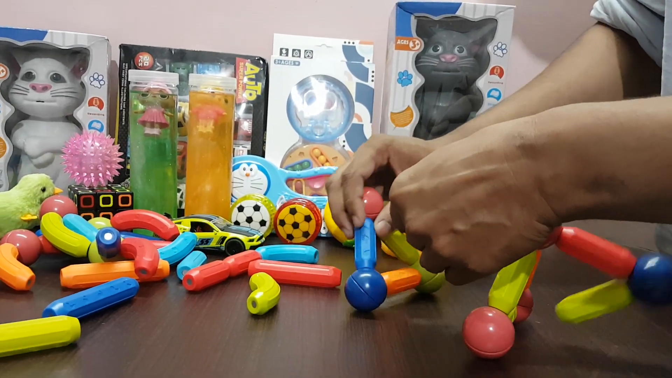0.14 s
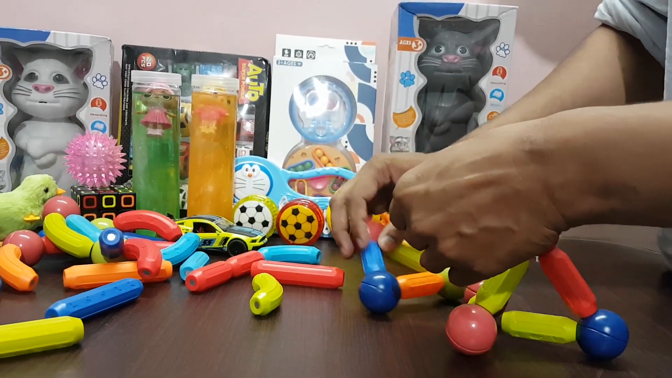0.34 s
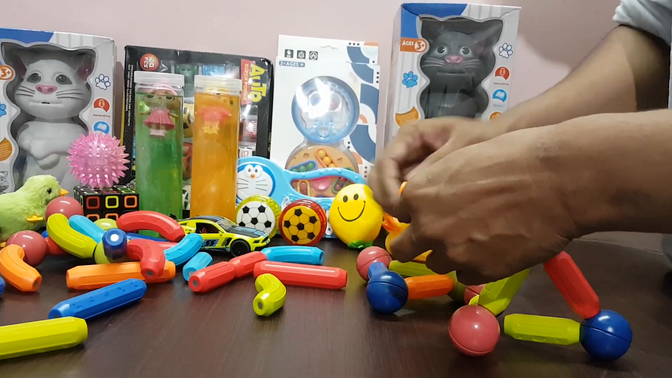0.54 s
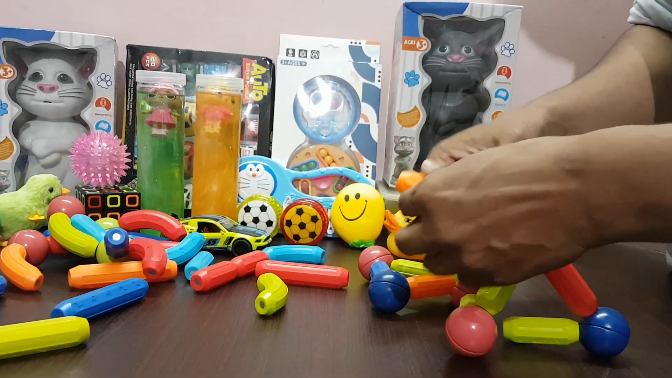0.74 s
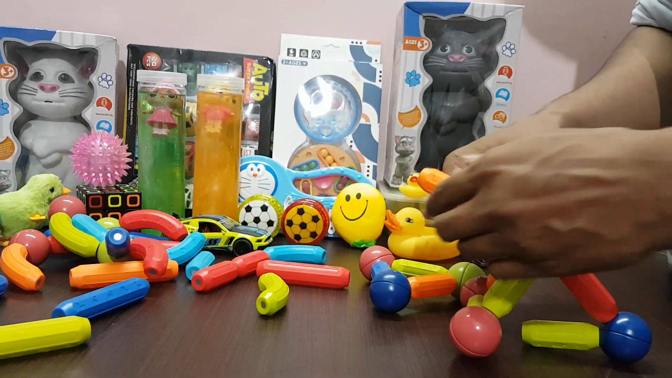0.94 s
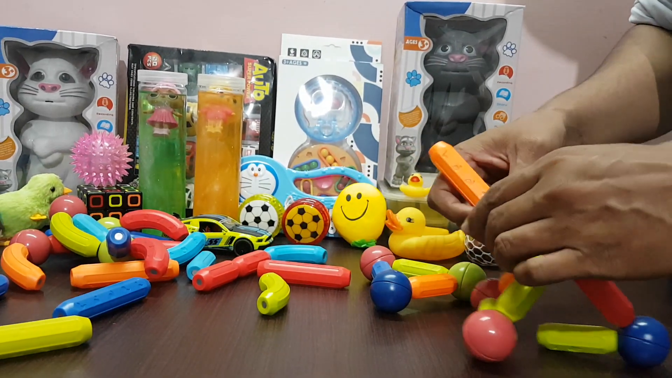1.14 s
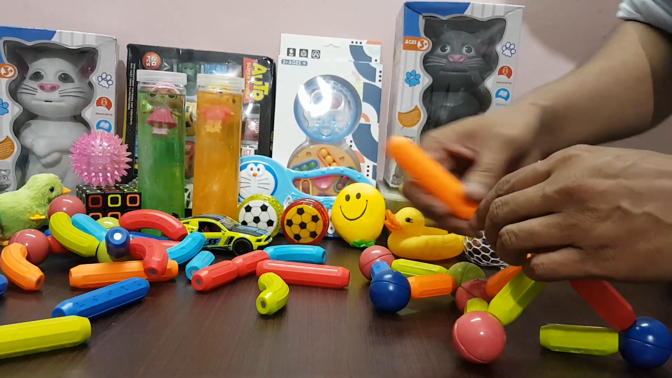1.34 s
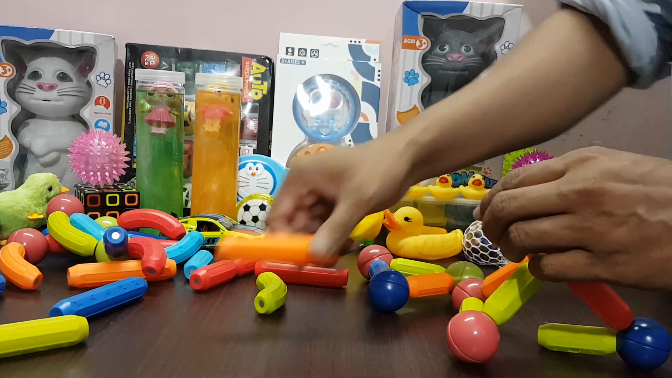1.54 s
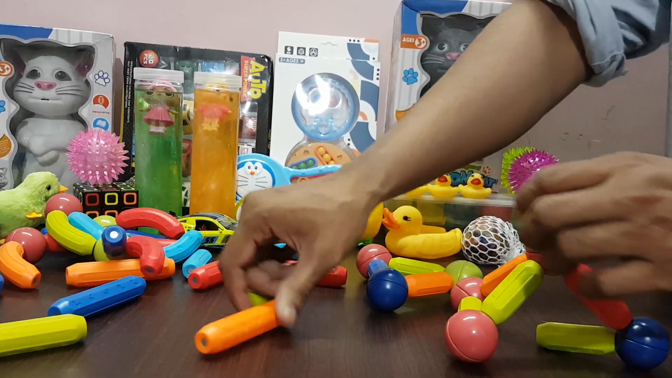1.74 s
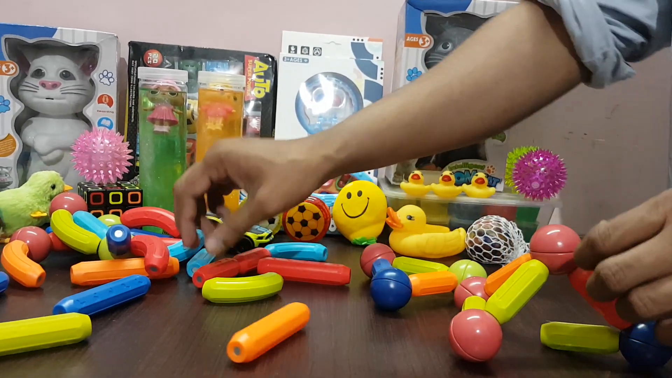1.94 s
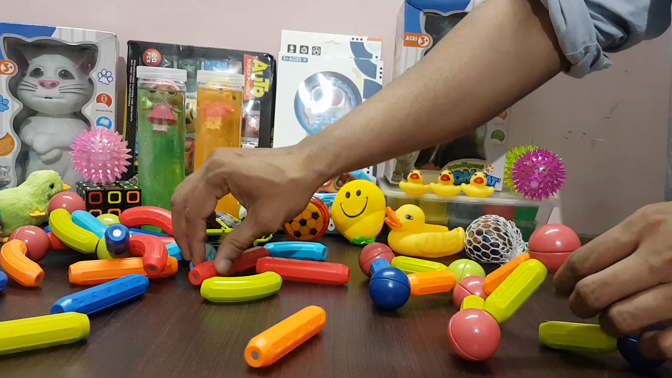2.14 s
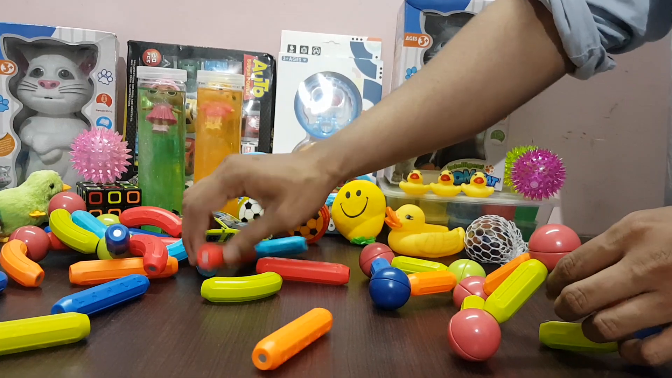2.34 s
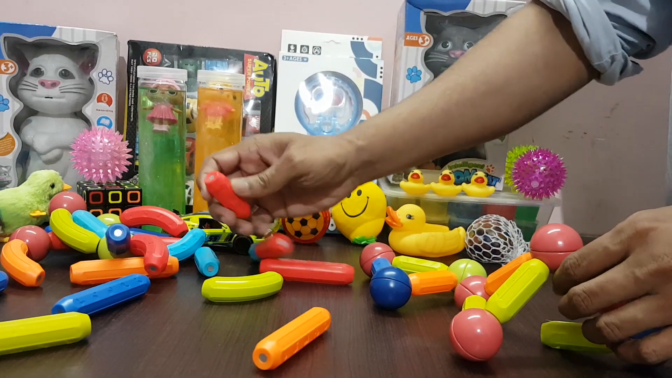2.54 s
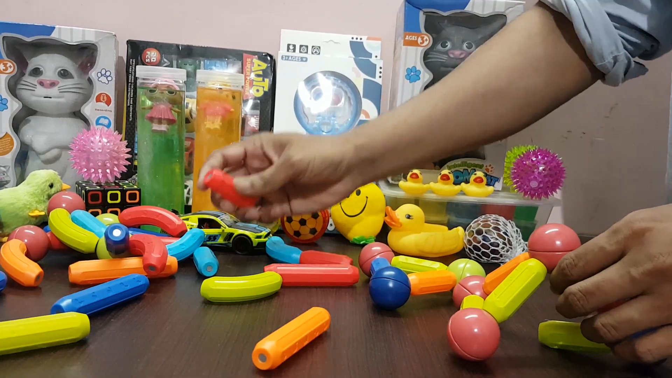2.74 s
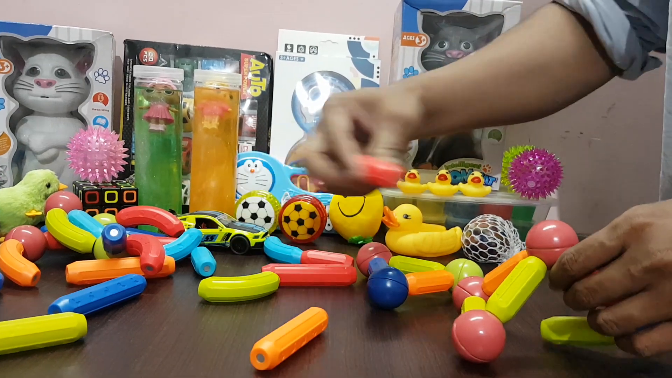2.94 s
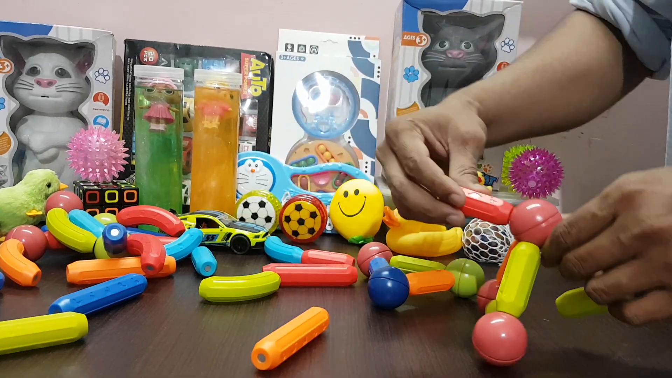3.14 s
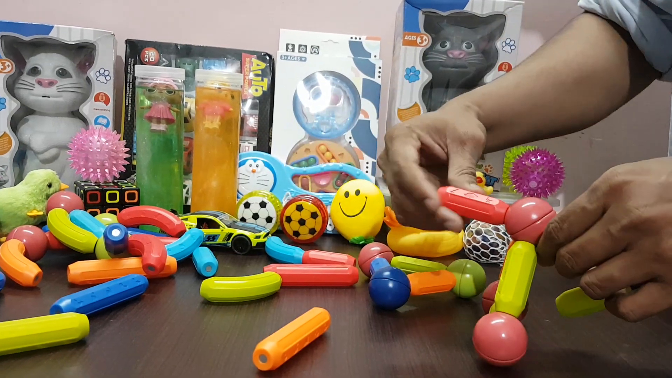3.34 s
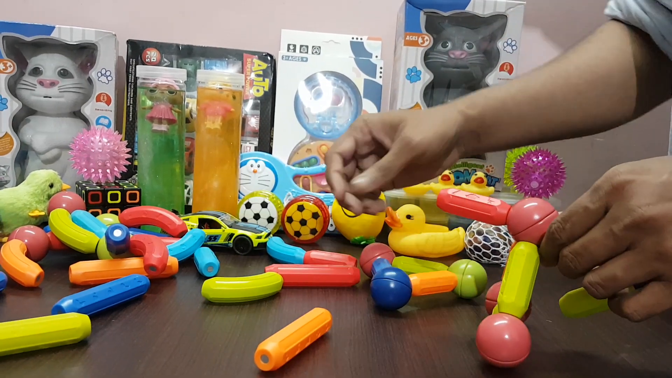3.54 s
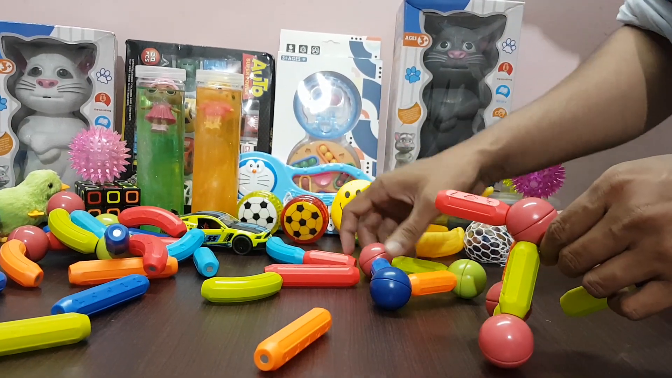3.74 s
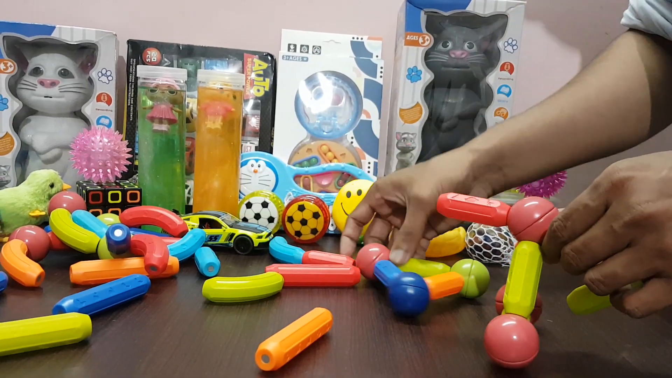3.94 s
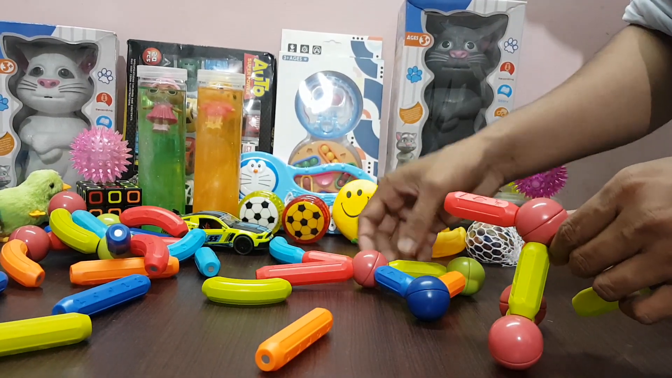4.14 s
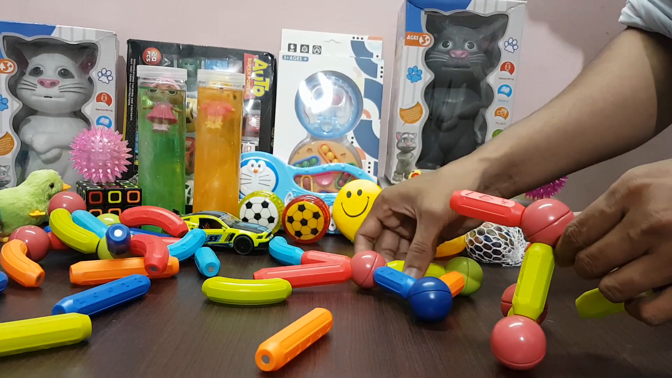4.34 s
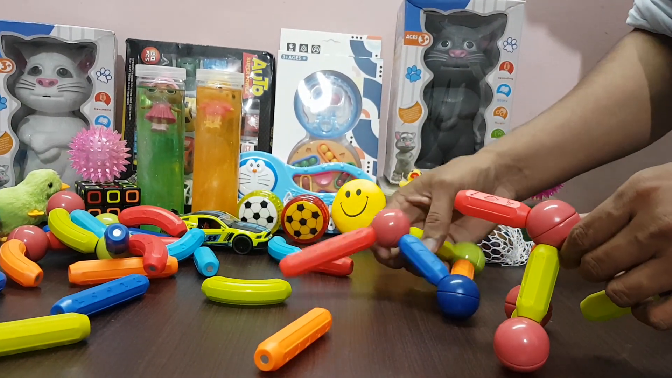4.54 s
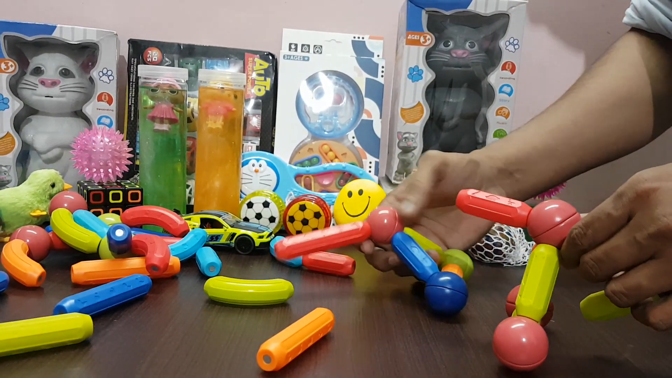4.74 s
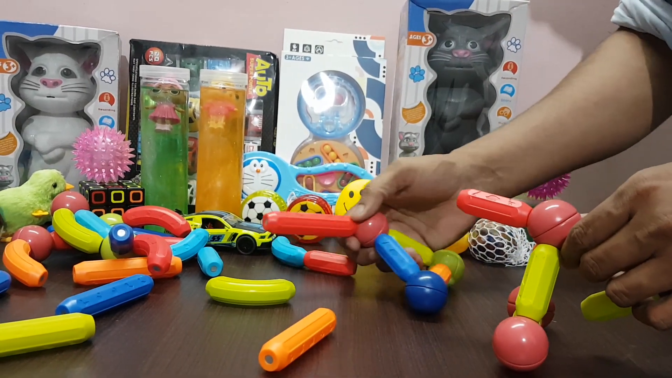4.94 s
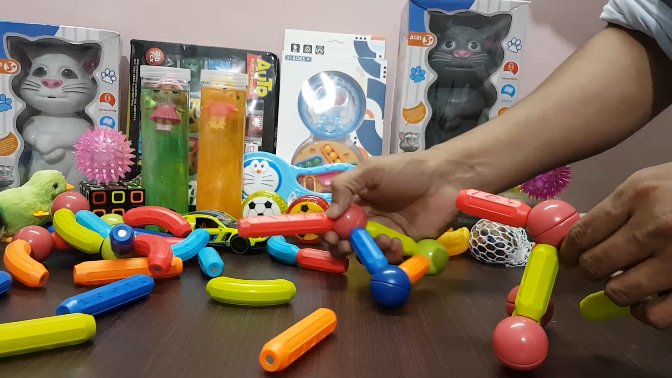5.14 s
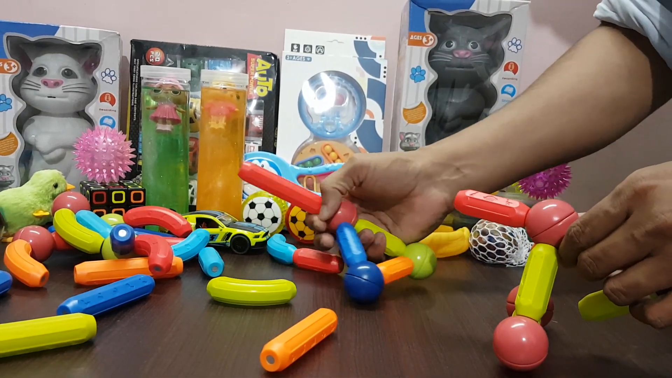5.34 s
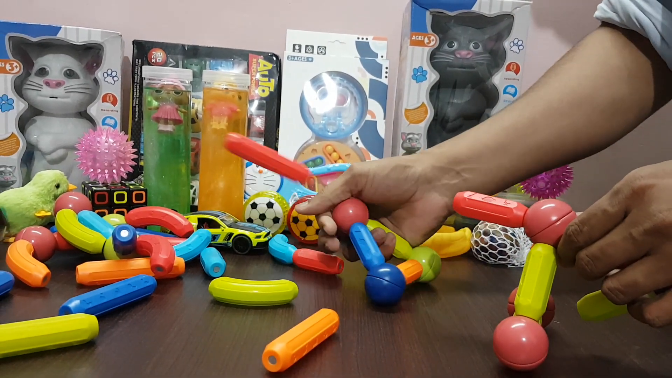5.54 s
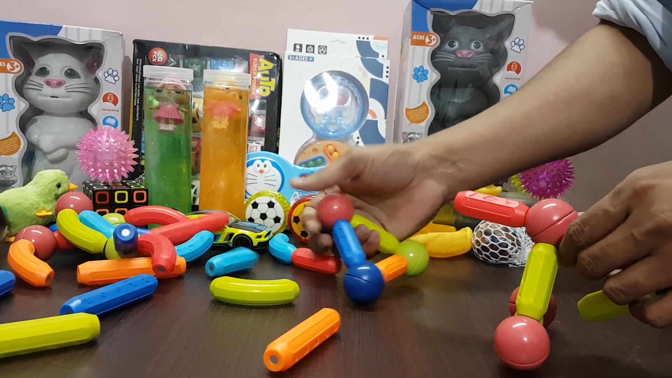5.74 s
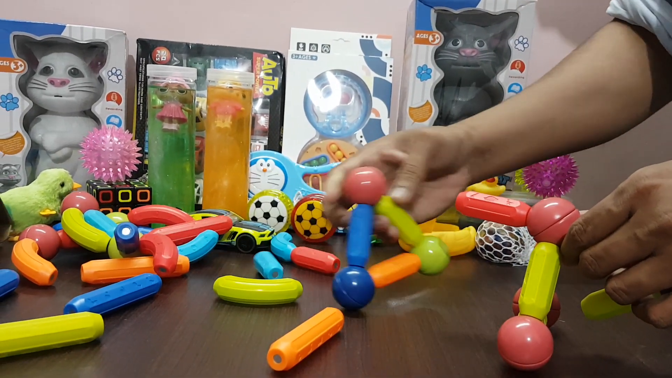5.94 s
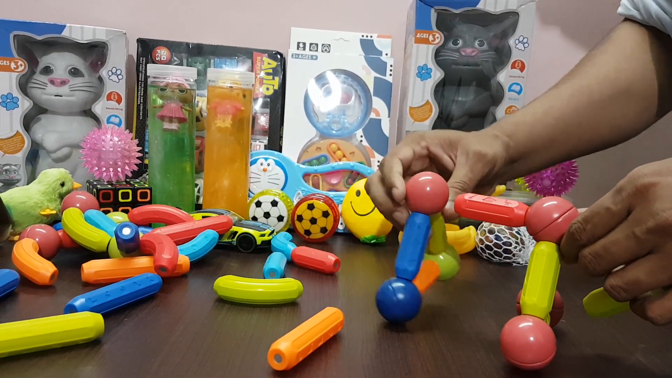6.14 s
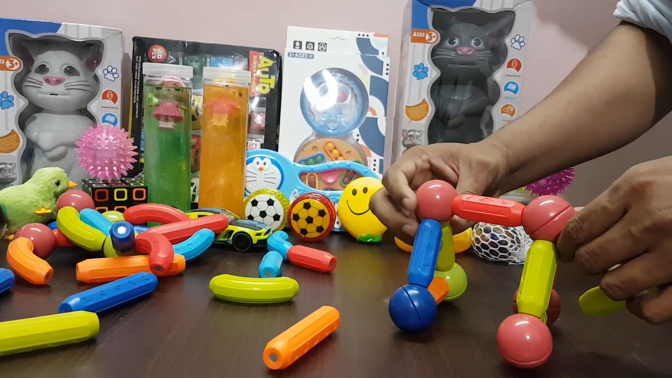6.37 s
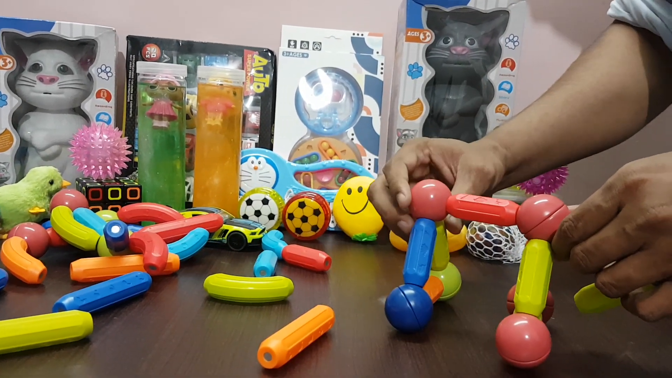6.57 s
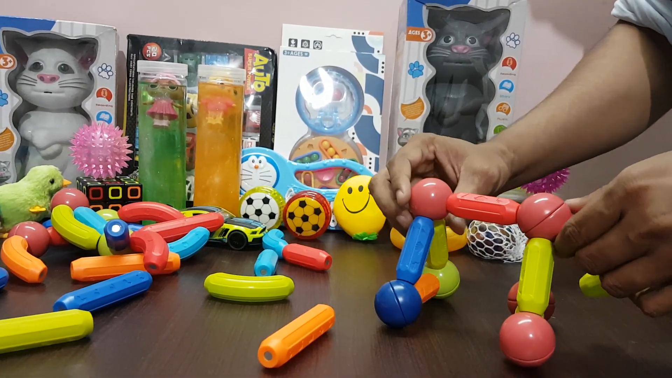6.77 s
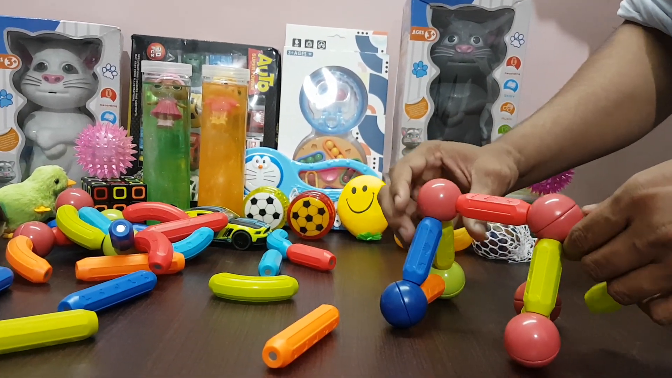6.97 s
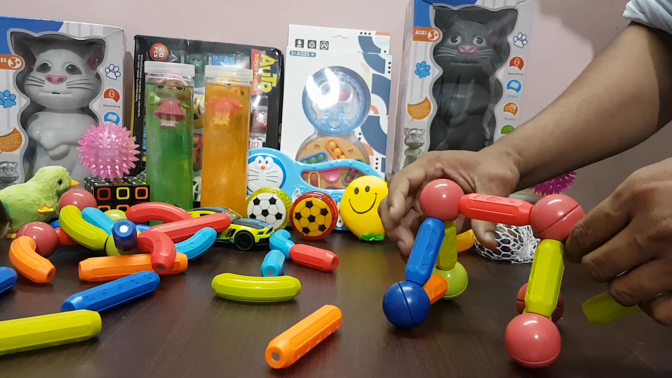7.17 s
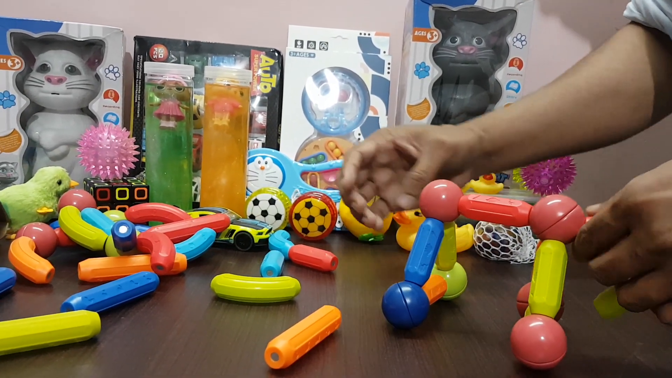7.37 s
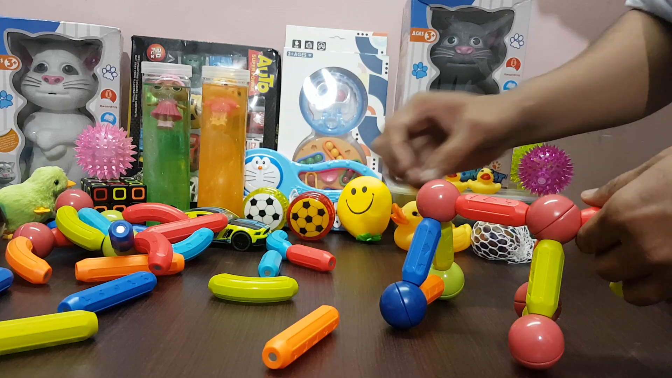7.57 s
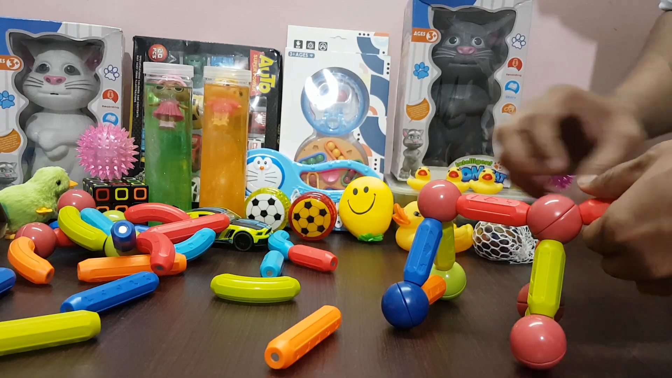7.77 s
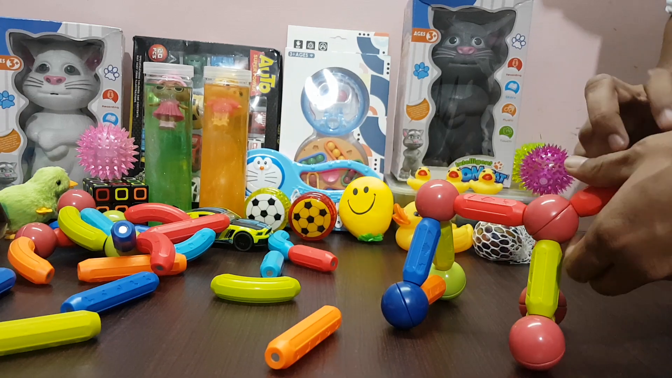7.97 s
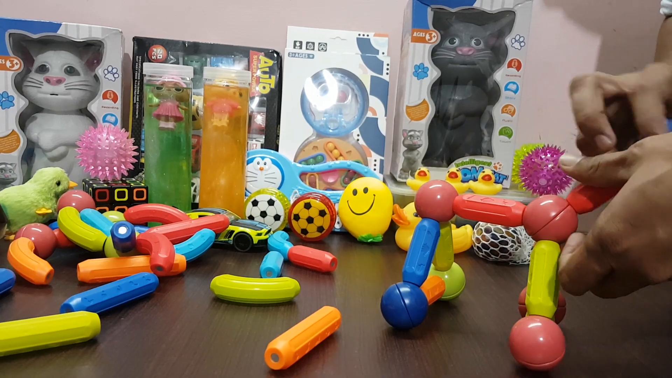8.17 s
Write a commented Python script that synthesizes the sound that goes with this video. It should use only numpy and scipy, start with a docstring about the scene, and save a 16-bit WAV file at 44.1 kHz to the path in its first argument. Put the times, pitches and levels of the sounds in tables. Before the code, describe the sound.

Magnetic toy pieces snap, slide and clack on a tabletop indoors, with loose magnets jingling and a few microphone pops.

```python
"""A short scrape and a sharp clack open the scene: hollow plastic sticks and balls snap together by their
magnets and knock on a wooden table in a small hard room. Each impact excites the modes of body, wall and
table top. Between blows, hands slide and rattle the pieces and loose magnets jingle; late on, a dropped
stick bounces. Three sharp pops jolt the left microphone alone. Mains hum and soft hiss fill the pauses;
midway the hum and some of the bass fade for a while."""
import sys
import numpy as np
from scipy import signal
from scipy.fft import rfft, irfft
from scipy.io import wavfile
from scipy.ndimage import uniform_filter1d

SR = 44100
rng = np.random.default_rng(int(sys.argv[2]) if len(sys.argv) > 2 else 0)


def dump_mix(stems):
    """Bounce the given channels to the path in sys.argv[1] as a 16-bit WAV at rate SR."""
    frames = np.atleast_2d(stems).T  # one column per channel
    limited = np.clip(frames, -1, 1)  # hard clip at full scale
    pcm = np.round(limited * 32767).astype(np.int16)
    wavfile.write(sys.argv[1], SR, pcm)


N = 362052

# Impacts: (time [s], body level [dB], table thump [dB re body], wall ring [dB re body],
# tick [dB re body], body mode [Hz], wall mode [Hz], tick mode [Hz])
IMPACTS = [(0.16, -3, -10.5, -6.5, -10, 690, 3240, 5700), (0.31, -20, -21, 0, 0, 1050, 2500, 6240),
           (0.349, -13, -8, -4.5, 1, 1530, 3380, 7500), (0.474, 0.5, -13.5, -14, -21, 920, 2200, 12400),
           (0.498, -7.5, -21, -16, -24, 846, 2070, 7460), (0.525, -12.5, -12, -14, -22, 1250, 2520, 7040),
           (0.722, -41, -4, -3, -8.5, 845, 2180, 7000), (1.06, -44, -8.5, -6, -5.5, 466, 3130, 7000),
           (1.523, -53.5, -6.5, 5.5, -5.5, 768, 3530, 7520), (1.736, -12, -21, -1.5, 0.5, 1960, 2515, 7930),
           (1.786, -22.5, -18.5, 1.5, 8.5, 600, 2320, 7830),
           (1.806, -16.5, -33, -0.5, -21, 1180, 2320, 7300), (1.832, -22, -19, -0.5, 7, 1740, 3240, 7700),
           (2.106, -24.5, -34, 1.5, -3, 1130, 2480, 7550), (2.174, -36.5, -10, -12, -23, 581, 2470, 6950),
           (2.21, -34.5, -13, 4.5, 2.5, 509, 2480, 6130), (2.239, -17, -22, -32, -21, 1510, 2240, 7150),
           (2.261, -21, -27, -34, -19, 820, 2230, 6620), (2.5, -35, -12, -14, -8, 925, 2430, 11100),
           (2.551, -32.5, -23, 4.5, -1, 1020, 2050, 6000),
           (2.601, -10.5, -19.5, -1.5, -2, 1220, 2950, 7200), (2.625, -21.5, -30, -6, 1, 859, 2720, 7230),
           (2.696, -26.5, -11.5, 0.5, -13, 842, 3130, 7050), (2.76, -8.5, -27, -7, -17, 1860, 3030, 5900),
           (2.786, -21, -16, -3, -3, 1930, 2000, 10800), (2.796, -21.5, -16, 4.5, -4, 1880, 2720, 6600),
           (3.221, -22.5, -25.5, 5, 8.5, 1830, 2620, 13900), (3.463, -55, -10, 7.5, -16.5, 825, 3340, 5700),
           (3.825, -38, -11, -1, -19, 846, 2333, 6880), (4.027, -22.5, -24, -1.5, -14, 880, 3040, 7150),
           (4.065, -12, -15, -7, -27, 850, 2720, 7320), (4.084, -13.5, -27, -6, -3.5, 1180, 2050, 7300),
           (4.116, -19.5, -14.5, 3, 4, 780, 2870, 7330), (4.251, -39, -17, -2.5, -7, 458, 3700, 6400),
           (4.364, -41.5, -21, 2, 2, 1160, 2540, 7250), (4.395, -36, -32, -10, -14, 705, 2530, 7740),
           (4.424, -40, -21, 7, -4, 452, 2530, 7600), (4.498, -37.5, -32, 11, 5, 856, 2800, 6500),
           (4.542, -37.5, -33, -30, -22, 800, 3210, 6110),
           (4.676, -17.5, -17.5, -20, -16.5, 452, 2600, 5330), (4.665, -49, -20, 8, -1, 800, 2550, 5800),
           (4.801, -36.5, -32, 3, -6, 1890, 2050, 5950), (4.818, -40.5, -10, 3.5, -28, 1400, 2660, 6230),
           (4.883, -39, -11, -8, 2, 455, 3800, 5800), (4.894, -30.5, -15.5, 3.5, -3.5, 860, 2000, 5850),
           (5.001, -48.5, -8, 7, 8, 452, 2560, 8120), (5.017, -50, -21, 5, 19.5, 845, 2620, 7300),
           (5.035, -46, -8, 7.5, 11.5, 654, 2180, 7140), (5.061, -29, -23, 2.5, -4, 507, 2100, 11100),
           (5.256, -40.5, -29, 3, -4, 912, 3200, 6940), (5.294, -35, -28, -3.5, -13, 1210, 2600, 7360),
           (5.458, -49.5, -16, 15, 10, 883, 3150, 7240), (5.544, -49, -17, 7, 8, 1370, 3220, 7200),
           (5.597, -14, -10, -12.5, -29, 800, 2080, 7600), (5.761, -9, -23, 0, -4.5, 1560, 2330, 12600),
           (5.78, -20.5, -4.5, 7.5, 9.5, 1180, 3090, 7300), (5.792, -20.5, -9, 6, 4, 800, 3170, 7300),
           (6.388, -24.5, -2, -24, -13, 860, 2220, 6700), (6.412, -24, -28, -2.5, -7, 603, 3350, 14100),
           (6.423, -31, -4, 4, 1, 834, 2510, 7440)]
# Timbre of the dropped stick: the last six columns of IMPACTS
STICK_TIMBRE = (-18.5, -6.5, -22.5, 1180, 2595, 5000)
# Modes of the hollow bodies: (frequency [Hz], bandwidth [Hz], gain [dB])
BODY_MODES = [(620, 93, -4.5), (922, 99, 6), (1180, 53, -1.5), (1603, 97, 4), (1790, 73, -8),
              (2345, 83, -5.5)]
# Modes of the thin walls: (frequency [Hz], bandwidth [Hz], gain [dB])
WALL_MODES = [(2600, 540, 0.5), (3210, 220, 9), (5000, 400, -10.5), (6300, 870, -1), (7600, 810, 2.5),
              (10900, 400, -11), (13900, 9100, 1.5)]
# Modes of the table top: (frequency [Hz], gain [dB], nominal decay time [s])
TABLE_MODES = [(102.3, -6, 0.29), (193, -6.5, 0.19), (261.4, -2, 0.15), (327.4, -4, 0.062),
               (446, -0.5, 0.097)]
# Spells of jingling: (start [s], end [s], first level [dB], last level [dB], nominal tick rate [1/s],
# lowest mode [Hz], extra gain of the second mode [dB])
JINGLE_SPELLS = [(1.762, 1.856, -50, -33, 98, 3430, -9), (1.839, 2.034, -43.5, -67.5, 92, 3480, 13),
                 (2.295, 2.372, -54, -64.5, 75, 3600, -5.5), (2.437, 2.521, -66, -68.5, 98, 3500, 1.5),
                 (2.619, 2.76, -54, -41, 61, 3210, -1.5), (4.028, 4.198, -44.5, -52, 70, 3300, -1),
                 (4.366, 4.46, -63, -63, 76, 2530, -5), (4.502, 4.581, -55, -67, 70, 3200, 5),
                 (4.973, 5.037, -62, -68, 82, 2530, -5), (5.256, 5.595, -58, -60, 62, 3306, -3.5),
                 (5.931, 6.1, -62, -65, 73, 2600, 8), (1.16, 1.238, -68, -73, 70, 3580, -1.5),
                 (5.769, 5.901, -27, -48, 74, 3256, -4.5)]
# Modes of a loose magnet in its socket: (frequency ratio [1], bandwidth per stage [Hz], gain [dB])
MAGNET_MODES = [(1, 229.5, 3.5), (1.81, 280, -9.5), (2.21, 480, -3.5), (3.42, 804, -17)]
# Activity of the hands among the pieces: (time [s], level [dB])
HAND_ACTIVITY = [(0, -60.5), (.7, -59), (1.35, -66), (1.6, -77), (2.0, -61), (2.9, -74), (3.0, -61),
                 (3.5, -74.5), (3.8, -79.5), (4.0, -60), (4.9, -61), (5.3, -55.5), (5.6, -62),
                 (5.72, -64.5), (6.1, -57.5), (6.5, -69), (7.2, -77), (7.6, -87)]
# Pieces slid over the table: (start [s], fade time [s], rumble [dB], knocking [dB], rubbing [dB],
# hollow note [Hz])
SLIDE_STROKES = [(0.0, 0.21, -44, -54, -78, 750), (0.88, 0.085, -46.5, -54.5, -91, 1200),
                 (1.15, 0.12, -43, -46.5, -68.5, 1203), (1.849, 0.11, -50, -43, -52, 910),
                 (2.062, 0.061, -49, -37, -51.5, 1190), (2.257, 0.19, -46, -43, -56.5, 810),
                 (2.437, 0.13, -48, -50.5, -59, 900), (2.637, 0.17, -62, -43, -52, 1200),
                 (3.857, 0.057, -46.5, -42.5, -64, 620), (4.367, 0.077, -76, -59, -80, 1160),
                 (4.51, 0.061, -79, -51, -75, 1200), (4.565, 0.05, -78, -57.5, -75, 855),
                 (5.072, 0.13, -56, -48, -66, 533), (5.372, 0.14, -56, -50, -70, 820),
                 (5.772, 0.18, -45, -29.5, -51, 1190), (6.159, 0.16, -51.5, -51, -67.5, 1150),
                 (6.72, 0.12, -72, -65.5, -85, 1700)]
# Jolts of the left microphone: (time [s], peak level [dB])
MICROPHONE_POPS = [(2.41, -6), (2.434, -2), (2.542, -5)]
# Reverberation of the room: (frequency [Hz], time to fall 60 dB [s])
ROOM_DECAY = [(100, 0.38), (400, 0.39), (1200, 0.26), (4000, 0.24), (9000, 0.24), (15000, 0.17)]
# Likeness of the sound at the two microphones: (frequency [Hz], correlation [1])
STEREO_CORRELATION = [(60, 0.16), (240, 1), (950, 0.43), (3770, -0.54), (15000, -0.18)]
# Harmonics of the mains hum: (frequency [Hz], level [dB])
HUM_HARMONICS = [(101, -59), (202, -70)]
# Passing fade of the hum, which the bass follows in part: (time [s], gain [dB])
HUM_FADE = [(0, 0), (2.88, 0), (2.97, -10), (3.9, -13), (4.55, -12), (4.68, -1), (8.21, -1)]
# Spectrum of the hiss: (frequency [Hz], relative density [dB])
HISS_SPECTRUM = [(20, -42.5), (50, -19), (90, -15.5), (150, -19.5), (260, -20), (420, -25), (1300, -28.5),
                 (3000, -35), (5500, -41.5), (7600, -40.5), (9800, -51.5), (13000, -44.5), (16000, -43)]

CONTACT_S, IMPACT_DELAY_S = .0024, .001  # decay of the chatter; lag behind the onset of the rattle
SHARP_DB_PER_DB, SHARP_FROM_DB = 0.3, -15.5  # harder ticks carry more broad treble
BOUNCE_START_S, FLIGHT_S, RESTITUTION, ROCK_S = 5.829, .05, .8, .0205
BOUNCE_DB, SOFTENING = -15, 1.3  # first landing; amplitude follows this power of the flight time
HANDS_MIX_DB = (0.5, 1.5, -17.5)  # rumble, knocking, rubbing
RATTLE_DB, RATTLE_T60_S = (-21.5, -29.5, -34.5), (0.33, 0.22, 0.12)  # the same three, after an impact
SLIDE_RISE_S, SLIDE_FADE_DB = 0.016, -15  # the fade is reached after one fade time
NOTE_DB, NOTE_WIDTH_HZ = -1.5, 110  # a slide's hollow note, relative to its knocking
RECOIL_HZ, IMPACT_ECHO_DB, HISS_DB = 88, -4, -62.5
THIN_HZ, THIN_SHARE = 180, 0.66  # below this the pieces follow a share of the hum's fade in dB
LEFT_RE_RIGHT_DB, BAND_LIMIT_HZ = -2, 16100


def impact(db, table_db, wall_db, tick_db, body_hz, wall_hz, tick_hz):
    """Modal excitation: a brief contact force rings the piece, its wall and the table under it."""
    t = np.arange(-8, 8184).clip(0) / SR
    force = contact_force(t)
    push = np.exp(-t / 0.0029) * [[1], [1]]
    table_ring = resonances(push, [(hz, 2.6 / decay_s, level) for hz, level, decay_s in TABLE_MODES])
    table = band(table_ring + 0.18 * force + 0.024 * push, 45, 550)
    hollow = resonance(force, body_hz, width_hz=500)
    body = band(resonances(force, BODY_MODES) + hollow + 0.69 * force, 350, 2400)
    wall = band(resonance(force, wall_hz, width_hz=450) + 0.12 * force, 1600, 5900)
    sharpness = gain_of(SHARP_DB_PER_DB * (db + tick_db - SHARP_FROM_DB))
    treble = 0.16 * resonances(force, WALL_MODES) + .15 * force
    tick = band(resonance(force, tick_hz, width_hz=500) + sharpness * treble, 5600, 24000)
    knock = peaked(body) + gain_of(table_db) * peaked(table) + gain_of(wall_db) * peaked(wall)
    return gain_of(db) * (knock + gain_of(tick_db) * peaked(tick))


def contact_force(t):
    """Broadband excitation: a brief chatter of contacts has a nearly flat spectrum."""
    fall = np.exp(-t / CONTACT_S) * np.minimum(t / 0.00031, 1)
    spectrum = rfft(shared_noise(len(t), spread=.6) * fall)
    force = irfft(spectrum / (abs(spectrum) + 1e-9), len(t)) * fall ** 0.11
    force[1] = np.roll(force[1], rng.integers(-6, 7))  # the sound reaches one microphone first
    return force / np.linalg.norm(force[0]) * np.linalg.norm(fall)


def stick_bounces(count):
    """Inelastic rebound: flights shorten and landings soften until the stick rocks. Gives impact rows."""
    flights = np.maximum(FLIGHT_S * RESTITUTION ** np.arange(count), ROCK_S)
    times = BOUNCE_START_S + np.cumsum(flights) - flights
    levels = BOUNCE_DB + SOFTENING * 20 * np.log10(flights / FLIGHT_S)
    return [(start, db, *STICK_TIMBRE) for start, db in zip(times, levels)]


def magnet_jingle(start, end, first_db, last_db, ticks_per_s, lowest_hz, second_db):
    """Repeated impact: a loose magnet chatters by fits and starts, each tick ringing the same modes."""
    n = round((end - start) * SR)
    drift, grit, fits = rng.standard_normal((3, n))
    cycles = np.cumsum(ticks_per_s * (1 + 8.8 * uniform_filter1d(drift, 400))) / SR
    since_tick = (cycles % 1) / ticks_per_s
    force = (np.exp(-since_tick / .003) + .15) * (grit + .6 * rng.standard_normal((2, n)))
    force *= gain_of(4 * wander(fits, 900))
    sound = 0
    for k, (ratio, width, db) in enumerate(MAGNET_MODES):
        hz = ratio * lowest_hz
        mode = resonance(resonance(force, hz, width), hz, width)
        sound += gain_of(db + second_db * (k == 1)) * mode
    return gain_of(np.linspace(first_db, last_db, n)) * unit_rms(sound) * signal.windows.tukey(n, .1)


def handling_rattle(impacts):
    """Shot noise: dense tiny contacts of uneven size ring the pieces while the table rumbles along."""
    rumble, knocking, rubbing = handling_envelopes(impacts)
    size = gain_of(2.2 * np.minimum(rng.exponential(1, N), 4))
    touching = rng.random(N) < 2500 / SR  # contacts per second
    contacts = size * touching * shared_noise(N, spread=1.3)
    table = band(diffuse_noise(N), 120, 480)
    bodies = band(resonances(contacts, BODY_MODES) + .5 * contacts, 450, 3000)
    walls = band(resonances(contacts, WALL_MODES) + 0.072 * contacts, 2400, 16000)
    return rumble * unit_rms(table) + knocking * unit_rms(bodies) + rubbing * unit_rms(walls)


def handling_envelopes(impacts):
    """Drive and damping: hands and slides stir the pieces; after an impact they settle exponentially."""
    t = np.arange(N) / SR
    gain = gain_of(curve(HAND_ACTIVITY) + np.array(HANDS_MIX_DB)[:, None])
    for start, fade_s, *levels, _ in SLIDE_STROKES:
        add(gain, start, gain_of(levels)[:, None] * slide_envelope(fade_s))
    settling = gain_of(np.array(RATTLE_DB)[:, None] - 60 * t[:SR // 2] / np.array(RATTLE_T60_S)[:, None])
    for start, db, table_db, wall_db, *_ in impacts:
        add(gain, start, gain_of(db + np.array([[table_db], [0], [wall_db]])) * settling)
    return gain


def slide_notes():
    """Frictional excitation: rubbing noise drives the hollow resonance of each sliding piece."""
    out = np.zeros((2, N))
    for start, fade_s, _, knock_db, _, hz in SLIDE_STROKES:
        envelope = slide_envelope(fade_s)
        friction = shared_noise(len(envelope), spread=.6)
        note = unit_rms(resonance(friction, hz, NOTE_WIDTH_HZ))
        add(out, start, gain_of(knock_db + NOTE_DB) * envelope * note)
    return out


def slide_envelope(fade_s):
    """Attack and decay: a slide rises linearly, then fades along a Gaussian curve."""
    t = np.arange(0, 2 * fade_s, 1 / SR)
    return gain_of(SLIDE_FADE_DB * (t / fade_s) ** 2) * np.minimum(t / SLIDE_RISE_S, 1)


def microphone_pop(db):
    """Step response: the left microphone's bass cut swings a sudden jolt back through zero."""
    step = np.clip((np.arange(2000) - 60) / 6.5, 0, 1)
    swing = signal.lfilter(*signal.butter(2, RECOIL_HZ, "high", fs=SR), step)
    swing = signal.lfilter(*signal.butter(1, 22, "high", fs=SR), swing)
    return gain_of(db) * peaked(swing) * [[1], [0]]


def room(x):
    """Reverberation: sparse echoes of random sign die at a rate set by frequency; three tails take turns."""
    turn, out = np.arange(N) / SR * 2.3, 0
    for k in range(3):
        echoes = np.zeros((2, SR))
        arrivals = np.arange(200, SR - 20, 20) + rng.integers(0, 20, (2, (SR - 201) // 20))
        np.put_along_axis(echoes, arrivals, rng.choice([-1., 1.], arrivals.shape), 1)
        hz, t, spectra = signal.stft(echoes, SR, nperseg=512)
        spectra[1] = correlated(*spectra, hz[:, None])
        decay = gain_of(-60 * t / at_frequency(ROOM_DECAY, hz)[:, None])
        tail = signal.istft(spectra * decay, SR, nperseg=512)[1]
        crossfade = np.sqrt(2 / 3) * np.cos(np.pi * (turn + k / 3))  # constant total power
        out += signal.fftconvolve(x * crossfade, tail / np.linalg.norm(tail[0]), axes=1)[:, :N]
    return out


def hiss():
    """Spectrally shaped noise: the hiss of room and microphones, its bass fading with the hum."""
    shape = gain_of(at_frequency(HISS_SPECTRUM, np.fft.rfftfreq(N, 1 / SR)))
    noise = unit_rms(irfft(rfft(diffuse_noise(N)) * shape, N))
    return bass_fade(gain_of(HISS_DB) * noise, corner_hz=350, share=.5)


def mains_hum():
    """Modulation: two harmonics waver slightly in level and phase, and fade for a while."""
    t = np.arange(N) / SR
    level, phase = wander(rng.standard_normal((2, N)), 3000)
    hum = sum(gain_of(db + 1.2 * level) * np.sin(2 * np.pi * hz * t + .2 * phase * hz / 100)
              for hz, db in HUM_HARMONICS)
    return np.sqrt(2) * gain_of(curve(HUM_FADE)) * hum


def bass_fade(x, corner_hz, share):
    """Shelving filter: the bass follows a share of the hum's fade in decibels."""
    bass = signal.lfilter(*signal.butter(1, corner_hz, fs=SR), x)
    return x - (1 - gain_of(share * curve(HUM_FADE))) * bass


def resonance(x, hz, width_hz):
    """Damped oscillator: one mode with unit gain at its peak."""
    return signal.lfilter(*signal.iirpeak(np.clip(hz, 20, SR / 2.2), hz / width_hz, SR), x)


def resonances(x, modes):
    """Modal superposition: parallel modes of alternating sign."""
    return sum((-1) ** k * gain_of(db) * resonance(x, hz, width)
               for k, (hz, width, db) in enumerate(modes))


def band(x, lo_hz, hi_hz):
    """Butterworth band-pass with steep skirts."""
    edges = [lo_hz, min(hi_hz, SR / 2.1)]
    return signal.sosfilt(signal.butter(3, edges, "band", fs=SR, output="sos"), x)


def shared_noise(n, spread):
    """Partial coherence: common noise plus an independent part at each microphone."""
    return rng.standard_normal(n) + spread * rng.standard_normal((2, n))


def diffuse_noise(n):
    """Spatial coherence: noise whose likeness at the two microphones depends on frequency."""
    left, other = rfft(rng.standard_normal((2, n)))
    return irfft([left, correlated(left, other, np.fft.rfftfreq(n, 1 / SR))], n)


def correlated(left, other, hz):
    """Equal-power mixing: a right spectrum with the set correlation to the left."""
    likeness = np.clip(at_frequency(STEREO_CORRELATION, hz), -1, 1)
    return likeness * left + np.sqrt(1 - likeness ** 2) * other


def wander(noise, samples):
    """Double averaging turns noise into a slow fluctuation of rms 1."""
    return unit_rms(uniform_filter1d(uniform_filter1d(noise, samples), samples))


def curve(points):
    """Linear interpolation over the scene's time."""
    return np.interp(np.arange(N) / SR, *np.transpose(points))


def at_frequency(points, hz):
    """Interpolation on a log-frequency axis."""
    known_hz, values = np.transpose(points)
    return np.interp(np.log(hz + 1), np.log(known_hz + 1), values)


def gain_of(db):
    """Decibels to amplitude ratio."""
    return 10 ** (np.asarray(db) / 20)


def unit_rms(x):
    """Normalisation to rms 1."""
    return x / np.sqrt(np.mean(x ** 2) + 1e-20)


def peaked(x):
    """Normalisation to peak 1."""
    return x / (abs(x).max() + 1e-12)


def add(mix, start_s, sound):
    """Superposition of a sound from a given time."""
    part = mix[:, round(start_s * SR):][:, :sound.shape[1]]
    part += sound[:, :part.shape[1]]


def scene():
    """Superposition: direct sound, reverberation, hiss, hum and pops add at two microphones."""
    struck, jingling, pops = np.zeros((3, 2, N))
    impacts = IMPACTS + stick_bounces(count=10)
    for start, *strike in impacts:
        add(struck, start + IMPACT_DELAY_S, impact(*strike))
    for start, *spell in JINGLE_SPELLS:
        add(jingling, start, magnet_jingle(start, *spell))
    for start, db in MICROPHONE_POPS:
        add(pops, start, microphone_pop(db))
    rattle = handling_rattle(impacts) + slide_notes()
    direct = struck + jingling + 0.52 * rattle
    echoes = room(gain_of(IMPACT_ECHO_DB) * struck + 0.57 * jingling + 0.45 * rattle)
    heard = bass_fade(direct + echoes, THIN_HZ, THIN_SHARE) + hiss() + mains_hum()
    balance = gain_of([[LEFT_RE_RIGHT_DB / 2], [-LEFT_RE_RIGHT_DB / 2]])
    return heard * balance + pops


def record(dry):
    """Band limiting: a linear-phase low-pass removes the highest treble."""
    low_pass = signal.firwin(255, BAND_LIMIT_HZ, window=("kaiser", 9), fs=SR)
    return signal.oaconvolve(dry, low_pass[None], "same")


dry = scene()
out = record(dry)
dump_mix(out)
```